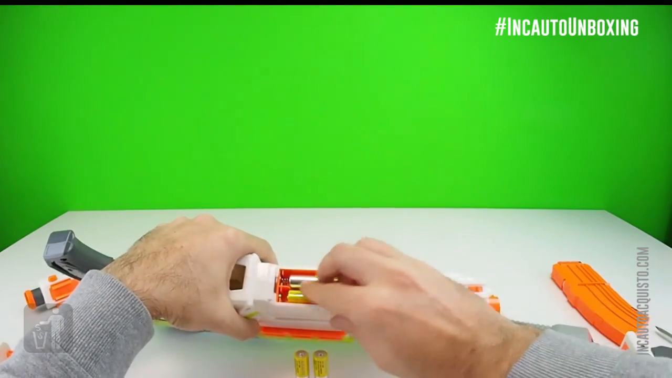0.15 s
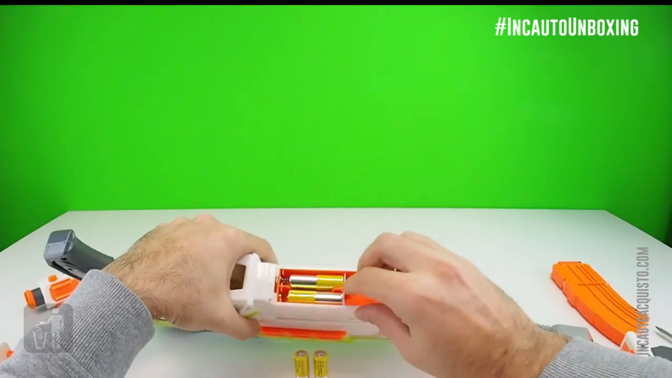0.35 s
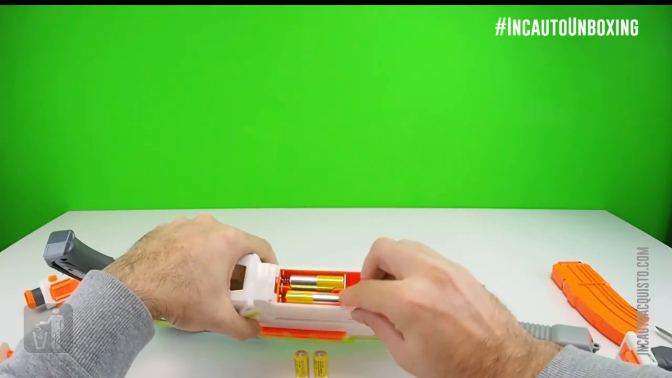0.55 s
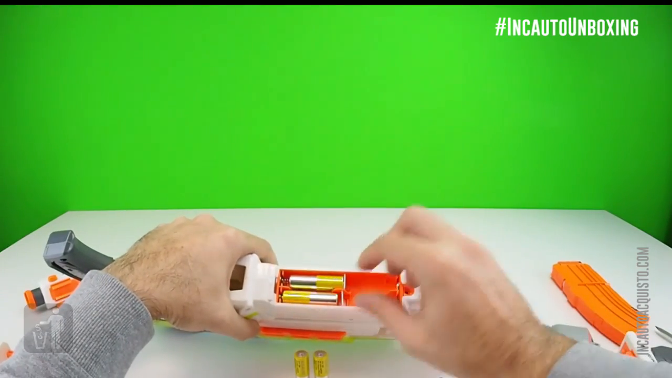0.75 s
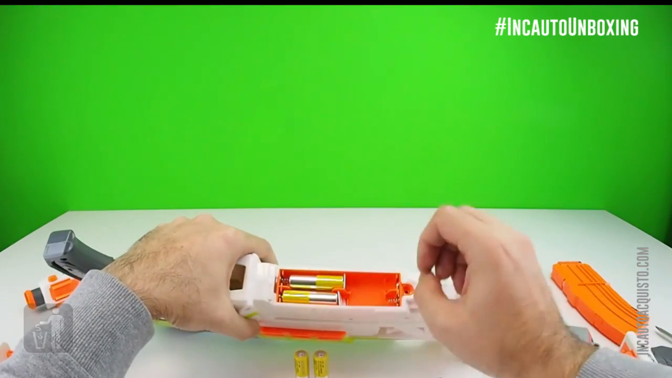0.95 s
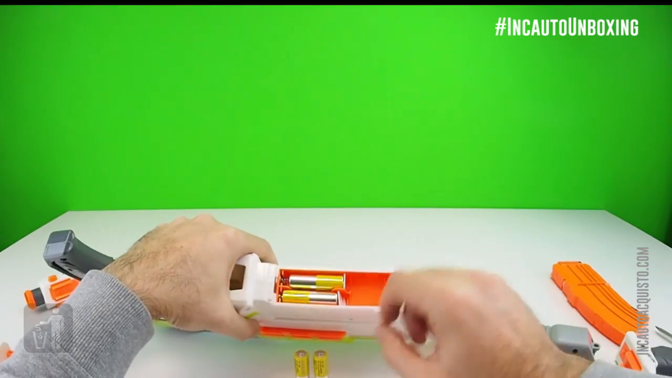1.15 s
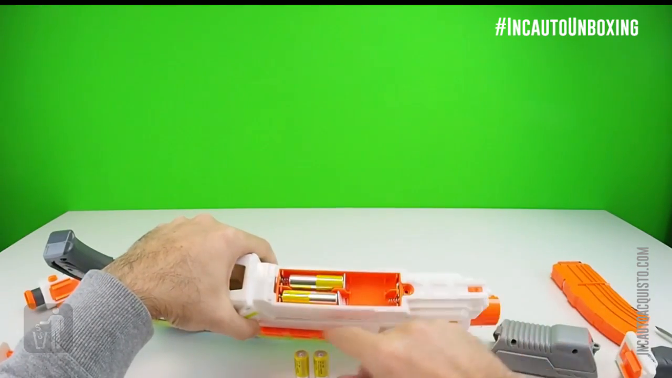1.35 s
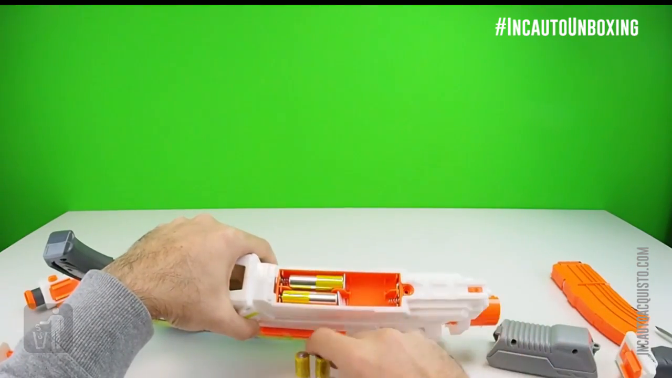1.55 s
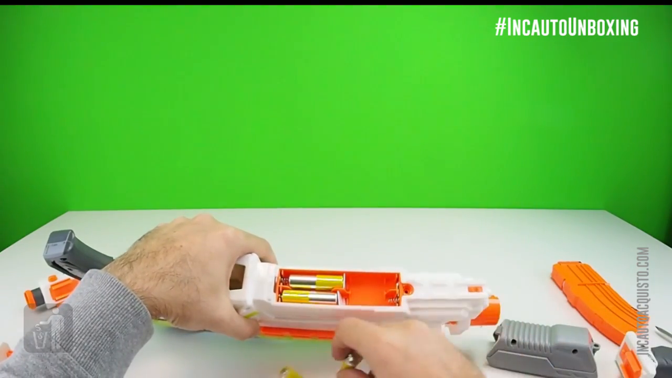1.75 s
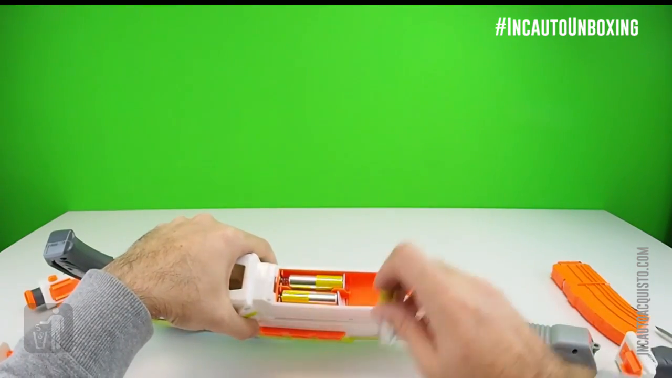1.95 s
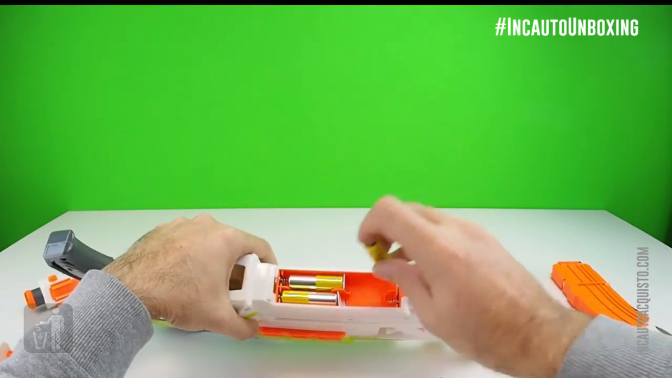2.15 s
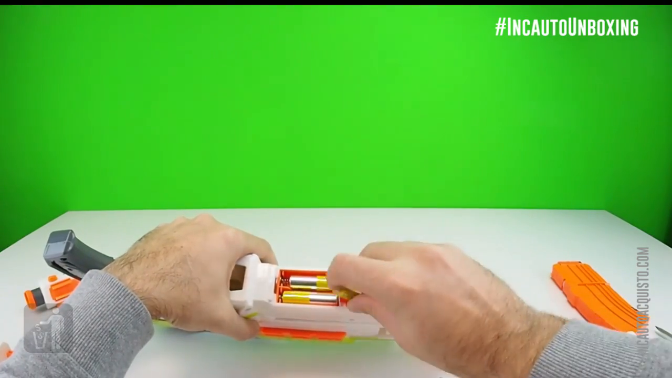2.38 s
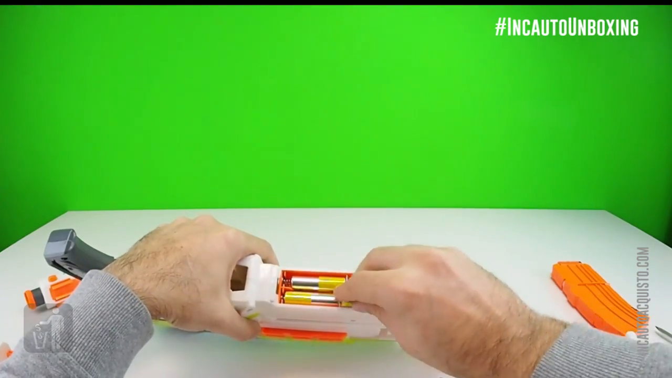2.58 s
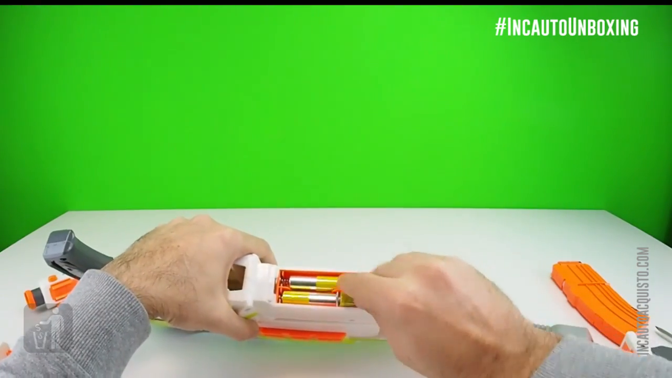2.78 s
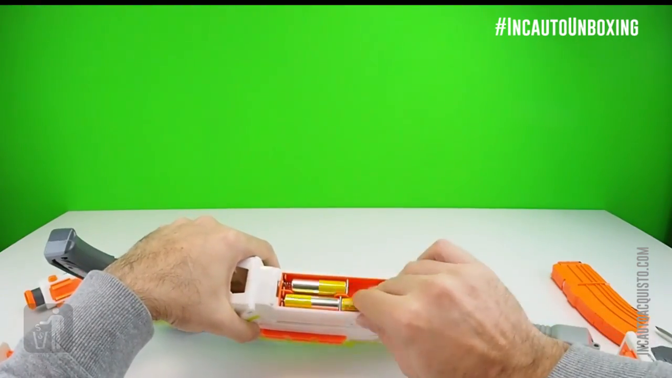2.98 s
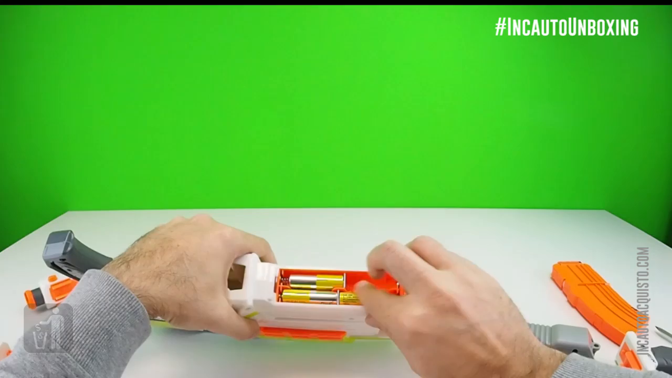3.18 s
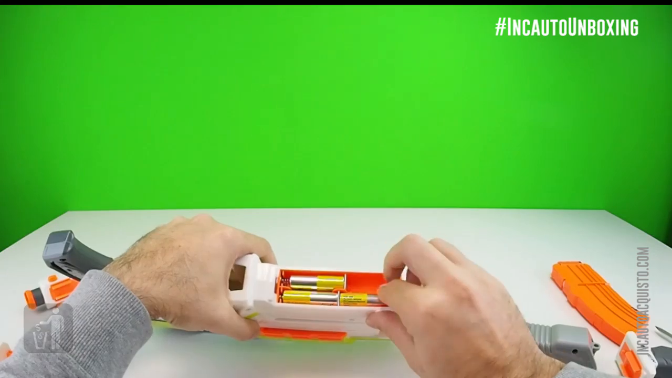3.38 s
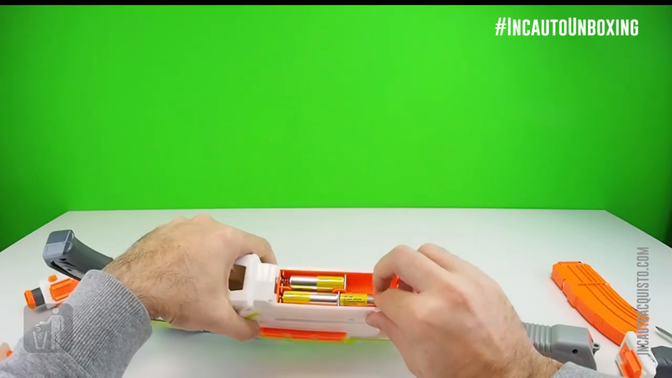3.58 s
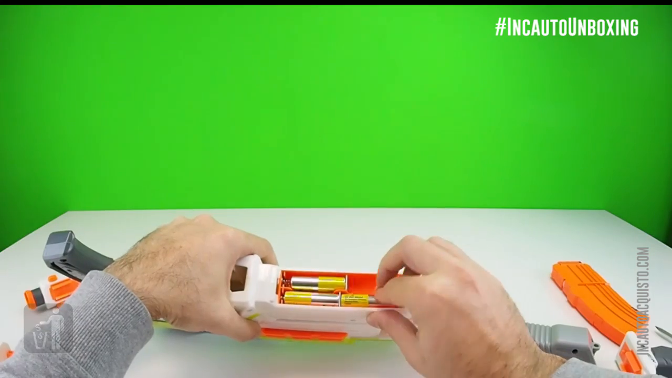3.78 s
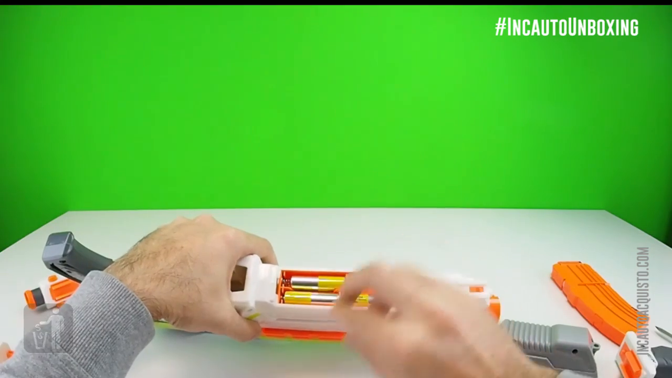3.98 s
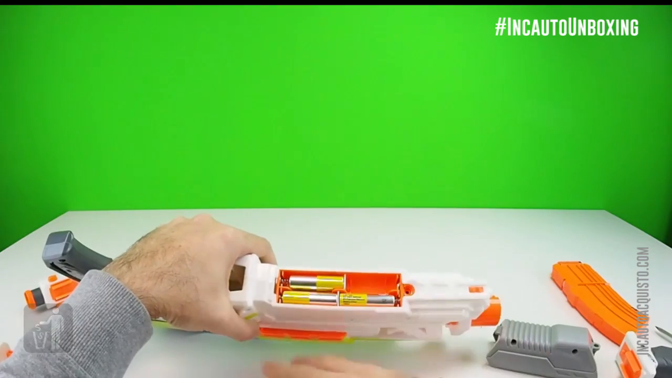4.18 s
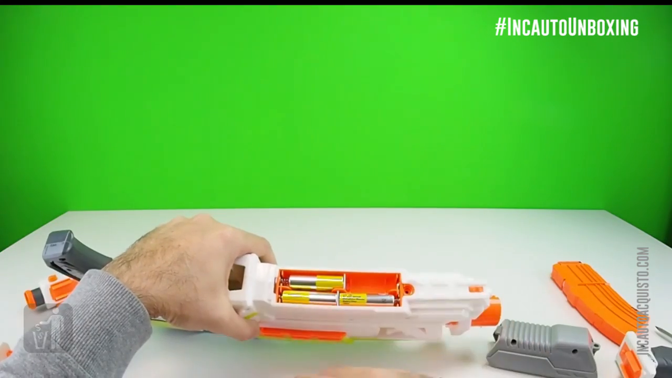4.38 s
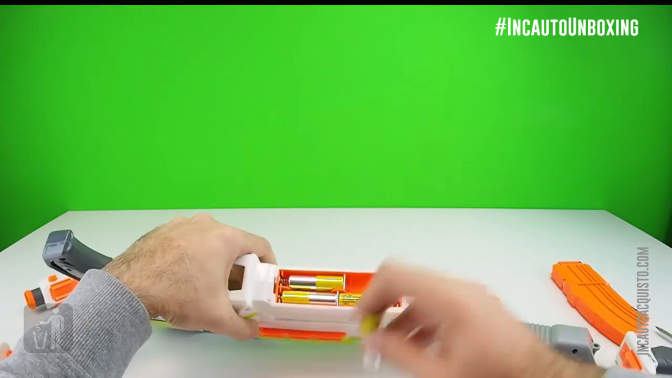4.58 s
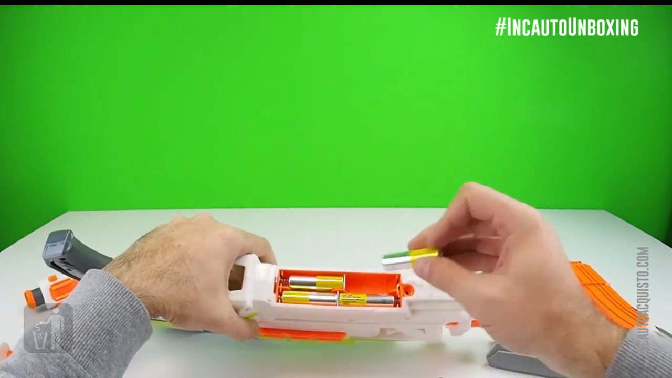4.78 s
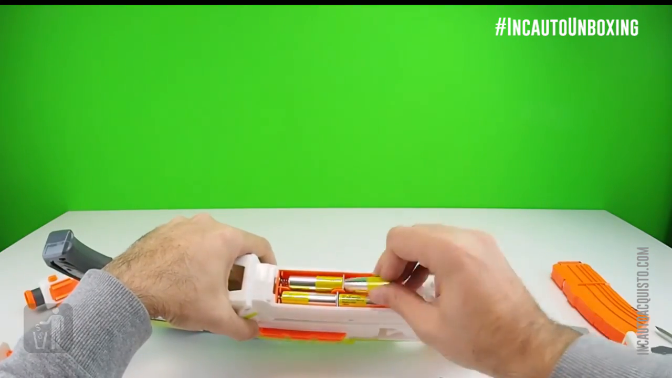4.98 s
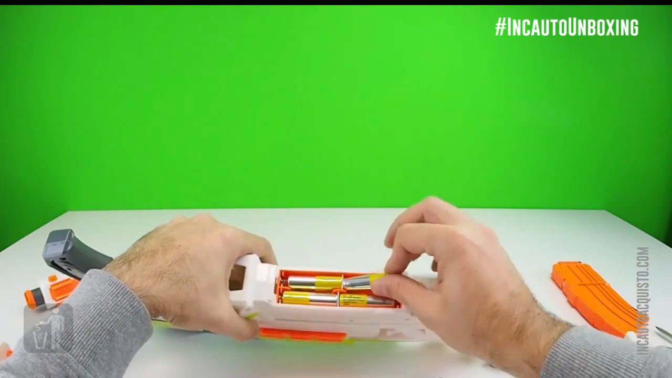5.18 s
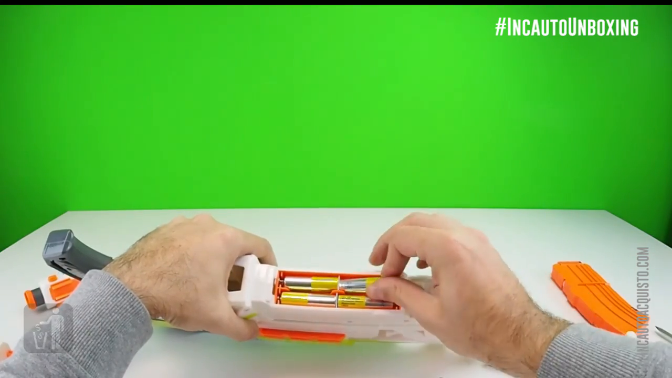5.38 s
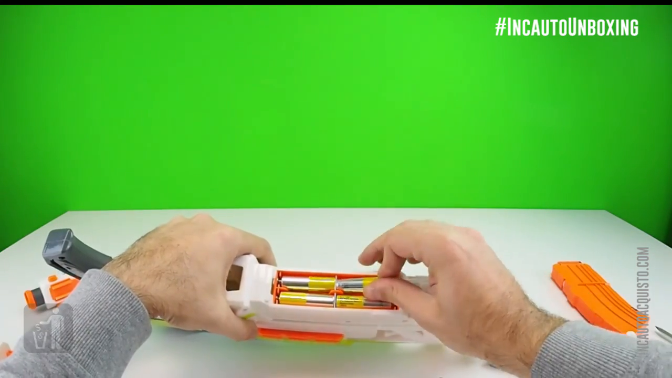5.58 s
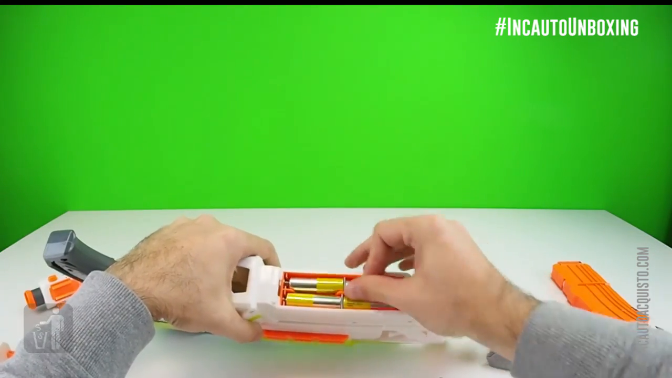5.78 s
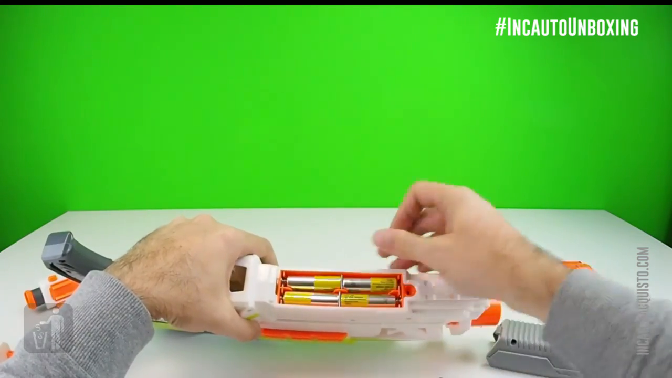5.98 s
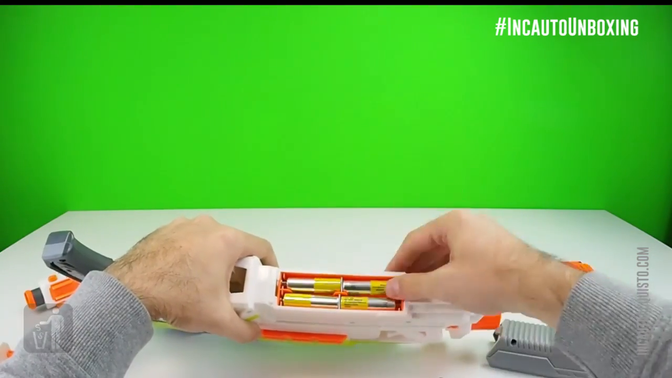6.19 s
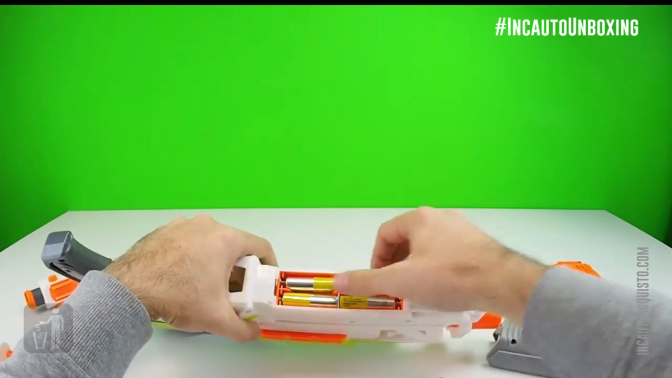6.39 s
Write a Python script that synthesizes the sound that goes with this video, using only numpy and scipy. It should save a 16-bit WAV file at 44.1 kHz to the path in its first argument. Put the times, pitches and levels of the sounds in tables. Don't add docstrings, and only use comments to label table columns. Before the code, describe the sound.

Batteries snap and click into a hollow plastic toy compartment, with finger scrapes, a hard clack of loose cells, and faint hiss in a small room.

```python
import sys
import numpy as np
from scipy import signal
from scipy.fft import rfft, irfft, next_fast_len
from scipy.io import wavfile
from scipy.ndimage import uniform_filter1d, map_coordinates

SR = 44100
rng = np.random.default_rng(int(sys.argv[2]) if len(sys.argv) > 2 else 0)


def makeup_ratio(level_db):
    decades = np.asarray(level_db, float) / 20
    return 10 ** decades


def master(y):
    cut = np.clip(np.atleast_2d(y).T, -1, 1)
    pcm = np.round(cut * 32767)
    wavfile.write(sys.argv[1], SR, pcm.astype(np.int16))


N = 284004
SIZE = 16384


def unit(x):
    return x / np.sqrt(np.mean(x ** 2) + 1e-20)


def along(points, hz):
    f, v = np.transpose(points)
    return np.interp(np.log(hz + 1), np.log(f + 1), v)


def filtered(x, response):
    m = next_fast_len(N + SR // 2)
    spectrum = rfft(x, m) * response(np.fft.rfftfreq(m, 1 / SR))
    return irfft(spectrum, m)[..., :N]


def stereo_angle(likeness, hz):
    return np.arccos(np.clip(along(likeness, hz), -1, 1)) / 2


# pitch_hz, level_db per Hz
HISS_SPECTRUM = [(15, -46), (30, -4.5), (90, -1.5), (230, -5), (520, -7.5), (1000, -9), (1660, -9),
                 (2290, -18.5), (3300, -15.5), (4900, -18), (6600, -26.5), (9030, -19.5), (12000, -25),
                 (15500, -28.5)]
# pitch_hz, likeness
HISS_LIKENESS = [(60, 0.48), (600, 0.49), (1400, 0.15), (3000, 0.0091)]


def hiss():
    def shape(hz):
        angle = stereo_angle(HISS_LIKENESS, hz)
        return makeup_ratio(along(HISS_SPECTRUM, hz)) * [np.cos(angle), np.sin(angle)]

    mid, side = filtered(rng.standard_normal((2, N)), shape)
    return makeup_ratio(-56) * np.array([mid + side, mid - side]) / np.std(mid)


# pitch_hz, likeness
ROOM_LIKENESS = [(300, 1), (1000, 0.72), (2500, 0.046)]
# pitch_hz, t60_s
ROOM_DECAY = [(200, 0.14), (600, 0.3), (1500, 0.18), (4000, 0.18), (10000, 0.19)]


def room_tail():
    length, onset_s = SIZE // 2, 0.00074
    hz, t, z = signal.stft(rng.standard_normal((2, length)), SR, nperseg=256)
    angle = stereo_angle(ROOM_LIKENESS, hz)[:, None]
    mid, side = z[0] * np.cos(angle), z[1] * np.sin(angle)
    decay = makeup_ratio(-60 * t / along(ROOM_DECAY, hz)[:, None])
    tail = signal.istft(np.array([mid + side, mid - side]) * decay, SR, nperseg=256)[1]
    tail = tail[:, :length] * (1 - np.exp(-np.arange(length) / SR / onset_s))
    return tail / np.linalg.norm(tail[0])


# delay_ms, level_db
TABLE_ECHOES = [
    [(.25, -48), (1.4, -8.5), (3.1, -19.5)],
    [(.31, -18.5), (1.3, -16.5), (3.3, -7.5)],
]


def ports(f, lag_ms):
    near = []
    for side in TABLE_ECHOES:
        near.append(1 + sum(makeup_ratio(db) * np.exp(-2j * np.pi * f * ms / 1000) for ms, db in side))
    delay_ms = (1 + np.array([[lag_ms], [-lag_ms]])) / 2
    return np.array(near) * np.exp(-2j * np.pi * f * delay_ms / 1000)


def swings(rows, rise_s):
    out, t = np.zeros(N + SR), np.arange(SR // 2) / SR
    for s, db, hz, t60 in rows:
        envelope = makeup_ratio(db + 3 - 60 * t / t60) * (1 - np.exp(-t / rise_s))
        out[round(s * SR):][:len(t)] += envelope * np.sin(2 * np.pi * hz * t)
    return out[:N]


# start_s, peak_db, pitch_hz, t60_s
THUMP_EVENTS = [
    (1.599, -60, 49.3, 0.11),
    (3.101, -35.5, 62.6, 0.13),
    (4.29, -41.5, 67.6, 0.18),
]


def table_thumps():
    return swings(THUMP_EVENTS, rise_s=0.0074)


def resonances(modes, f, scatter_db, damping=1):
    total = 0
    for k, (centre, width, db) in enumerate(modes):
        gain = (-1) ** k * makeup_ratio(db + scatter_db * rng.standard_normal())
        total = total + gain * 1j * f * width / (centre ** 2 - f * f + 1j * f * width * damping)
    return total


def swells(rows):
    t = np.arange(N) / SR
    return sum(makeup_ratio(db) * np.interp(t, [s - length / 2, s, s + length / 2], [0, 1, 0])
               for s, length, db in rows)


# pitch_hz, width_hz, level_db
HOLLOW_MODES = [(431, 51, 2), (507.6, 80, 0.5), (595, 82, -2), (673, 89, -20)]
# pitch_hz, width_hz, level_db
PANEL_MODES = [(910, 167, 0.5), (1067, 49, 13), (1230, 46, -22.5)]
# pitch_hz, width_hz, level_db
WALL_MODES = [(1694, 166, 4), (1890, 250, 2.5), (1950, 166, 1), (2415, 320, -3)]
# pitch_hz, width_hz, level_db
RIB_MODES = [(3185, 370, -1.5), (3478, 27.7, 0.5), (3783, 200, -4), (4560, 530, -4.5), (4900, 186, -4),
             (5480, 215, -18)]
# pitch_hz, width_hz, level_db
STEEL_MODES = [(5980, 580, -3.5), (9450, 2500, -2.5), (10760, 4100, 2), (12200, 6200, -2.5)]
# time_s, level_db
ROLL_CURVE = [
    (1.887, -21.5),
    (1.94, -34),
    (1.97, -24),
    (2.04, -27.5),
    (2.08, -40.5),
    (2.2, -76),
]
# middle_s, length_s, rasp_db, shell_db relative to the rasp
FINGER_STROKES = [(0.13, 0.18, -50.5, -12), (0.643, 0.18, -46.5, -1), (0.852, 0.16, -53, -1),
                  (1.56, 0.22, -70, 13), (2.272, .15, -59, -5), (2.505, 0.28, -45, -2),
                  (2.66, 0.14, -48, -11), (2.866, 0.19, -49, -12), (3.056, .2, -44, -11),
                  (3.805, 0.62, -61, 2), (4.35, .25, -53, -3), (5.17, 0.58, -55, -2), (5.802, 0.2, -43, 7),
                  (5.832, 0.17, -39.5, -12), (6.19, 0.46, -57.5, -1), (6.4, .12, -67, -1)]
# middle_s, length_s, level_db
SLEEVE_BRUSHES = [(1.65, 0.37, -50), (2.5, .3, -52.5), (3.27, 0.18, -50), (3.9, .4, -72), (4.35, 0.19, -45),
                  (5.05, 0.43, -52), (5.7, .3, -54.5), (5.92, 0.11, -50.5), (6.2, 0.33, -55)]


def scrape():
    roll_s, roll_db = np.transpose(ROLL_CURVE)
    roll = np.interp(np.arange(N) / SR, roll_s, makeup_ratio(roll_db), 0, 0)
    rasp_effort = swells([(s, length, db) for s, length, db, _ in FINGER_STROKES])
    shell_effort = swells([(s, length, db + rel_db) for s, length, db, rel_db in FINGER_STROKES])
    effort = roll * makeup_ratio([[0], [-12], [-16]])
    effort = effort + [rasp_effort, shell_effort, swells(SLEEVE_BRUSHES)]

    clumps = map_coordinates(rng.standard_normal(N // 150 + 4), [np.arange(N) / 150])
    slips = rng.standard_normal(N) * makeup_ratio(4.8 * clumps)
    rasp = filtered(slips, lambda f: resonances(WALL_MODES, f, 0) + resonances(RIB_MODES, f, 0)
                    + makeup_ratio(-29.0) * resonances(STEEL_MODES, f, 0))
    shell = filtered(slips, lambda f: resonances(HOLLOW_MODES, f, 0)
                     + makeup_ratio(-6.5) * resonances(PANEL_MODES, f, 0))
    sleeve = filtered(slips, lambda f: resonances([(231.0, 170, 0)], f, 0) ** 2)

    smooth_effort = uniform_filter1d(effort, size=200)
    drag = np.sum(smooth_effort * [unit(rasp), unit(shell), unit(sleeve)], axis=0)
    wet = signal.fftconvolve(drag[None], room_tail(), axes=1)[:, :N]
    return makeup_ratio(-10.0) * filtered(drag, lambda f: ports(f, 0.01)) + makeup_ratio(-9.0) * wet


# pitch_hz, width_hz, level_db
BLOW_MODE = [(1780, 3500, 0)]


def contacts(rows, rise_ms, force_ms, damping, room_db, scatter_db, panel_db):
    out, t, f = np.zeros((2, N + SIZE)), np.arange(SIZE) / SR, np.fft.rfftfreq(SIZE, 1 / SR)
    tails = [rfft(room_tail(), SIZE) for _ in rows[:8]]
    room_path = f * f / (f * f + 260 ** 2) * np.exp(-2j * np.pi * f * .003)
    burst = np.exp(-t * 1000 / force_ms) * (1 - np.exp(-t * 1000 / rise_ms))
    for k, (s, db, hollow_db, wall_db, steel_db) in enumerate(rows):
        force = rfft(rng.standard_normal(SIZE) * burst)
        force = force / uniform_filter1d(np.abs(force), size=60)
        flank_db = panel_db + 0.48 * hollow_db + 0.72 * wall_db
        families = [(RIB_MODES, 0), (BLOW_MODE, max(wall_db, -8) - 2.0), (HOLLOW_MODES, hollow_db + 5),
                    (PANEL_MODES, flank_db), (WALL_MODES, wall_db + 6), (STEEL_MODES, steel_db + 15.5)]
        sound = np.zeros(SIZE)
        for modes, rel_db in families:
            ring = irfft(force * resonances(modes, f, scatter_db, damping), SIZE) * (t < .1)
            sound += makeup_ratio(db + rel_db - 3.5) * ring / np.abs(ring).max()
        near = rfft(sound)
        blurred = np.sqrt(np.abs(uniform_filter1d(np.abs(near) ** 2, size=150))) * room_path
        direct = near * ports(f, rng.normal(0.022, 0.035))
        both = direct + makeup_ratio(room_db) * blurred * tails[k % len(tails)]
        start = round((s - .0005) * SR)
        out[:, start:start + SIZE] += irfft(both, SIZE) * (t < .3)
    return out[:, :N]


# start_s, rib_peak_db, then
# hollow_db, wall_db, steel_db relative to rib
SLOT_SLIDES = [(0.0864, -34.5, 6, -6, -20), (0.1813, -38.5, -2, -4.5, -11), (0.837, -45, -12, -7, -20),
               (1.8312, -50, 0, -1.5, -24), (2.4388, -30.5, -5, 1, -25), (2.4889, -33.5, -1, 0, -26),
               (2.6544, -45, -6, -6, -16), (2.811, -36, 3.5, -3.5, -16.5), (2.8735, -42.5, -16, -14, -19),
               (3.2074, -36.5, -20, -17, -21), (3.9844, -55, 13, 6, -12), (5.7611, -32.5, 8.5, -23, -23),
               (5.9858, -51, 4, 3, 0.5), (6.1994, -39, -12, -8, -15)]


def slides():
    return contacts(SLOT_SLIDES, rise_ms=4.1, force_ms=10.9, damping=0.96,
                    room_db=-6.5, scatter_db=4.0, panel_db=-0.5)


# start_s, rib_peak_db, then hollow_db, wall_db, steel_db relative to rib
SCOOP_CONTACTS = [
    (4.3346, -49.5, 7.4, 7, -7),
    (4.3513, -40, 0.5, 0.5, -16),
    (4.373, -49.5, 0.5, 4, -8),
]


def scoop():
    return contacts(SCOOP_CONTACTS, rise_ms=3.6, force_ms=12.3, damping=0.61,
                    room_db=-10.5, scatter_db=7.0, panel_db=11.5)


# start_s, rib_peak_db, then hollow_db, wall_db, steel_db relative to rib
CELL_KNOCKS = [
    (1.9176, -32, -8, 6, -25),
    (1.9459, -6.5, -35, -13, -25),
    (1.9513, -11.5, -41, -4.5, -31),
    (1.9866, -17, -14.5, -4.5, -19),
    (1.9894, -15, -40, -2.5, -32),
    (2.0113, -10, -20, -10.5, -31),
    (2.0137, -22.5, -44, 2.5, -32),
    (2.0271, -21.5, -22, -1, -36),
]


def cell_knocks():
    return contacts(CELL_KNOCKS, rise_ms=0.33, force_ms=0.94, damping=0.67,
                    room_db=-1.5, scatter_db=2.5, panel_db=7.5)


# start_s, rib_peak_db, then hollow_db, wall_db, steel_db relative to rib
HARD_CLACK = [
    (1.8856, 7, -24, -9, -26),
]


def clack():
    return contacts(HARD_CLACK, rise_ms=.05, force_ms=.25, damping=3,
                    room_db=-15, scatter_db=0, panel_db=-3)


def push():
    start_s, peak_db, rise_ms = 1.8856, .5, .09
    u = np.clip((np.arange(N) / SR - start_s) * 1000 / rise_ms, 0, 99)
    return makeup_ratio(peak_db) * np.e * u * np.exp(-u)


# start_s, peak_db, pitch_hz, t60_s
SPRING_TWANGS = [
    (2.377, -47, 4900, 0.042),
    (2.44, -43, 4900, .08),
    (2.476, -34.5, 4900, 0.12),
]
# start_s, peak_db, pitch_hz, t60_s
FREE_WALL_RINGS = [
    (0.632, -22, 1890, 0.066),
    (2.471, -27, 2880, .06),
    (2.977, -23, 1780, 0.13),
    (5.756, -23, 1700, 0.073),
]
# start_s, peak_db, pitch_hz, t60_s
HOLLOW_BOOMS = [(0.079, -16.5, 480, 0.097), (0.099, -16, 480, 0.072), (0.63, -7.5, 612, 0.071),
                (0.723, -21.5, 421.6, 0.15), (2.348, -32, 595, 0.097), (2.473, -17.5, 410, 0.066),
                (2.525, -21.5, 428, 0.079), (2.978, -22, 558, 0.14), (5.016, -14, 431, 0.1),
                (5.059, -16.5, 422, 0.13), (5.133, -12, 588, 0.043), (5.7, -26.5, 508, 0.14)]


def free_rings():
    thin_parts = swings(SPRING_TWANGS + FREE_WALL_RINGS, rise_s=0.0014)
    return thin_parts + makeup_ratio(-8) * swings(HOLLOW_BOOMS, rise_s=0.0037)


# start_s, rib_peak_db, then hollow_db, wall_db, steel_db
CELL_SNAPS = [(0.0783, -22, -0.5, -7, -9.5), (0.631, -8.5, -11.5, -3, -12), (0.6362, -19, -6.5, -3, -19),
              (0.6423, -31, -2.5, -22, -14), (0.7233, -25.5, -4.5, 3, -20),
              (2.3049, -26.5, -10.5, -2.5, -25), (2.3456, -16.5, -10, -7.5, -14.5),
              (2.3507, -16, -3.5, -2, -17), (2.373, -24, -17, -12, -32), (2.4702, -14.5, -7, -18, -30),
              (2.4753, -13.5, -13, -6.5, -25), (2.5262, -15, -12.5, -15, -29),
              (2.9617, -20.5, -12, -9, -23), (2.9754, -8.5, -11.5, -1.5, -20.5),
              (3.1577, -25, -21, -12.5, -16.5), (3.5196, -34.5, -14, -2, -23), (3.9749, -36.5, 3.5, 1, -19),
              (5.0148, -11, -10.5, -10.5, -28), (5.0334, -21.5, -2.5, -4.5, -23),
              (5.0589, -17, -4.5, -1, -24), (5.1319, -9.5, -9.5, -8.5, -20.5), (5.7505, -26.5, -3, -4, -29),
              (5.7553, -2, -23, -10, -16.5)]
# start_s, rib_peak_db, then hollow_db, wall_db relative to rib
SHELL_TAPS = [(0.099, -35.5, -2, 6.5), (0.548, -54, -1, 3), (0.6131, -33, -10, -7),
              (0.9562, -45.5, -30, -1.5), (2.456, -33, 3, 2.5), (2.6545, -44, 3, -9),
              (2.6748, -45, 3.5, -10), (2.6893, -50, 4, -5), (2.7914, -45.5, 0, -1), (3.0808, -47.5, 9, 5),
              (3.249, -47, 6.5, -1.5), (3.962, -37.5, -12, -18), (4.3067, -38.5, -12, -10),
              (5.284, -40.5, -7.5, -8), (5.3821, -36, -20, -3), (5.4252, -35.5, 0, -25),
              (5.699, -34, 2, -9), (5.8865, -33, -12, -27), (5.9387, -42.5, 3, -2.5),
              (6.2812, -43.5, -1.5, -17), (6.3437, -43, -9, -1)]
# start_s, hollow_peak_db
PAD_BUMPS = [(0.1502, -33.5), (1.6394, -65), (1.6994, -47), (2.7702, -38.5), (2.9317, -64), (3.097, -29),
             (3.6994, -48), (3.7597, -47), (5.4882, -40)]


def compartment():
    taps = [(*row, -20) for row in SHELL_TAPS]
    hollow_db, wall_db, steel_db = 26, 5, -18
    pads = [(s, db - hollow_db, hollow_db, wall_db, steel_db) for s, db in PAD_BUMPS]
    return contacts(CELL_SNAPS + taps + pads, rise_ms=0.34, force_ms=1.35, damping=0.82,
                    room_db=-7.0, scatter_db=3.0, panel_db=2)


def scene():
    background = hiss() + table_thumps() + scrape()
    loose_cells = slides() + scoop() + cell_knocks() + clack() + push()
    return background + loose_cells + free_rings() + compartment()


def low_pass(x):
    return signal.sosfilt(signal.butter(12, 15610, fs=SR, output="sos"), x)


def record(dry):
    tilt_db = [(300, 0.91), (4000, 0.022), (12000, 1.4)]  # pitch_hz, left gain; right is the opposite
    tilted = filtered(dry, lambda hz: makeup_ratio(np.array([[1], [-1]]) * along(tilt_db, hz)))
    mix = np.clip(tilted, -1, 1)
    return low_pass(mix)


dry = scene()
out = record(dry)
master(out)
```